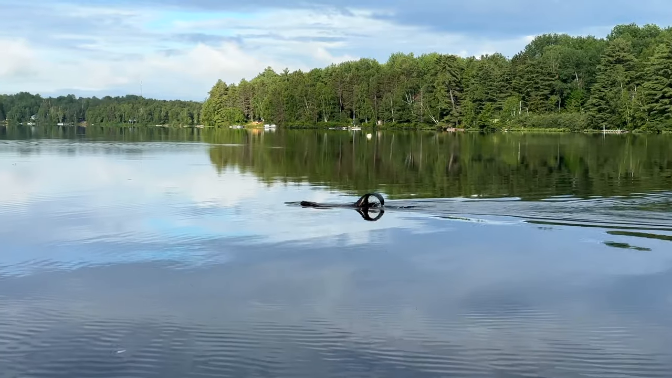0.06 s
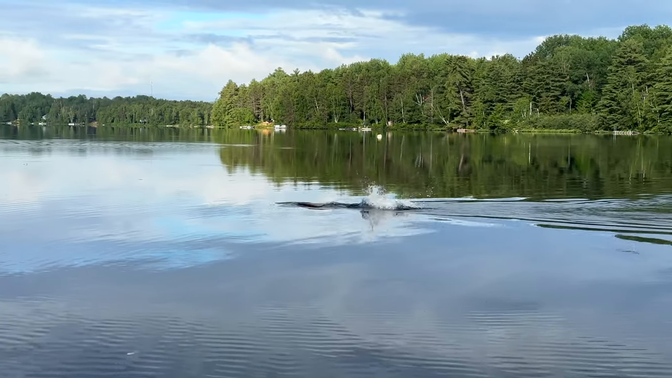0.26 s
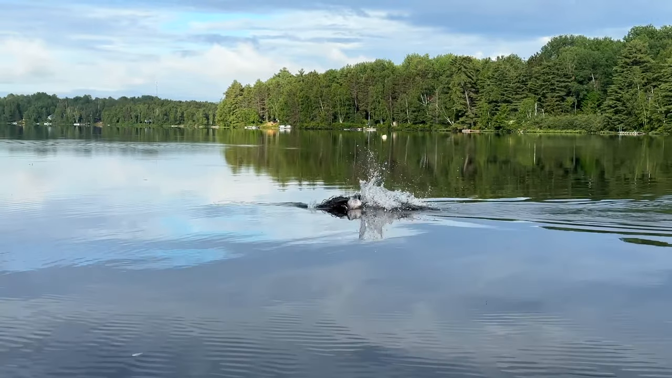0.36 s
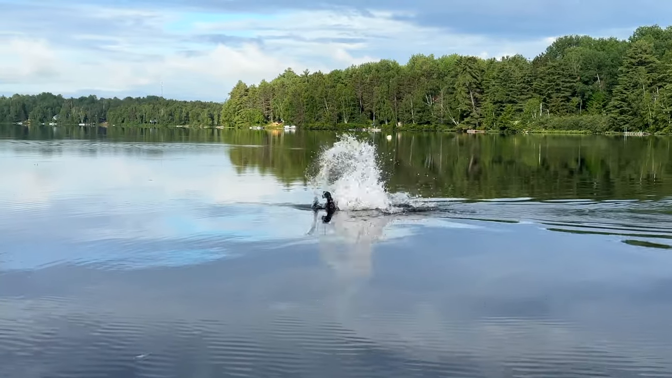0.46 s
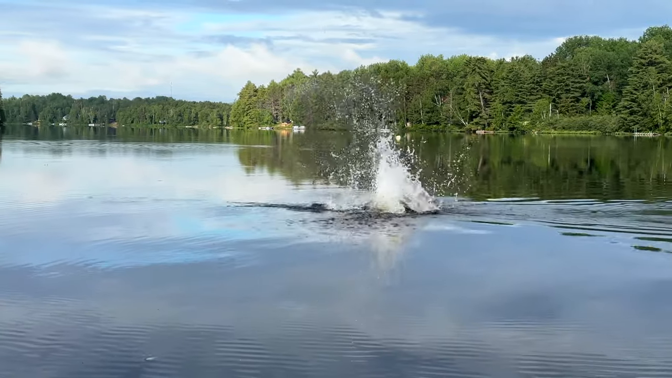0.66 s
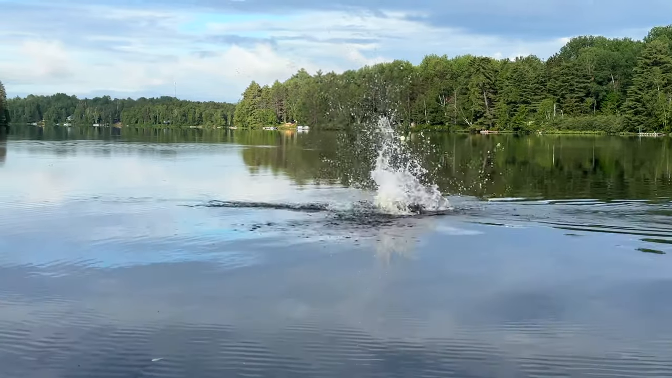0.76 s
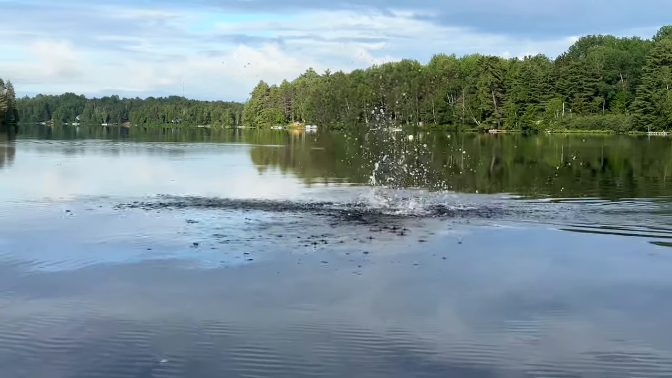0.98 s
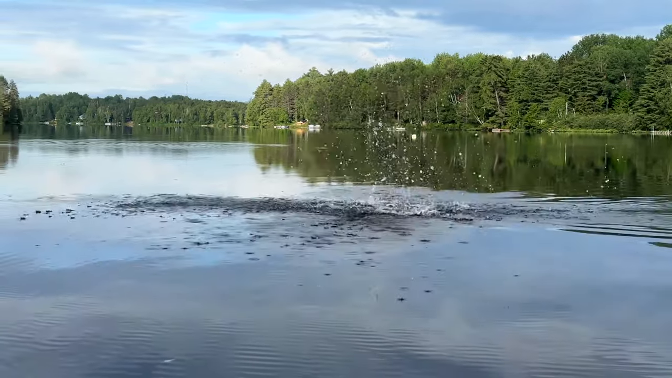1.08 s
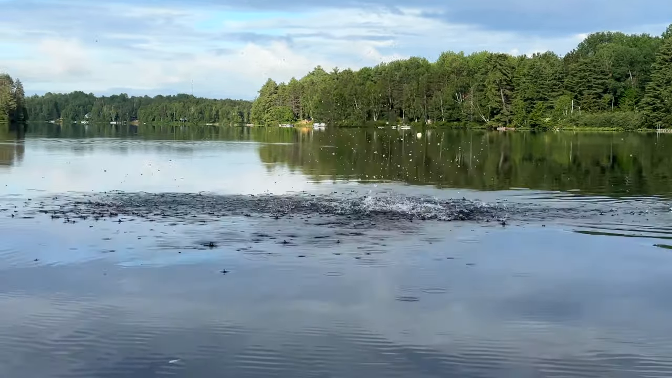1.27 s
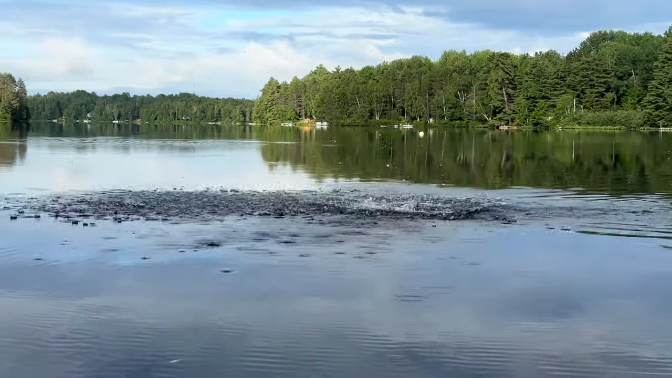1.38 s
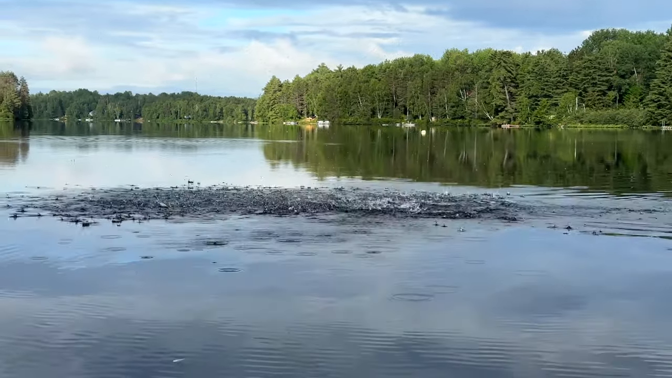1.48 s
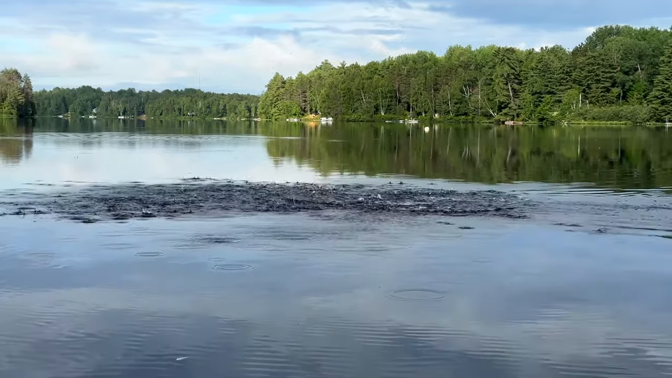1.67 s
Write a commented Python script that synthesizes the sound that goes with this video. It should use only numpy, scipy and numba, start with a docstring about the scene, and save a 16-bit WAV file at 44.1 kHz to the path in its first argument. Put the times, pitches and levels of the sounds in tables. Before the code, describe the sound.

One sharp slap of a beaver's tail on calm water, picked up by a phone on the lakeshore. Soft sloshing leads in; afterwards come a low plunging gulp and falling spray that fades to small ticks and plinks.

```python
"""Soft sloshing, a sharp smack, a deep gulp, then splashing that thins to single ticks and plinks.
A beaver on a still lake heaves, smacks its flat tail on the water and dives; the hollow it leaves
closes with the gulp. Thrown water falls back as churning bubbles and a patter of drops.
A phone with two microphones listens from the shore."""
import sys
import numpy as np
from scipy import signal
from scipy.fft import rfft, irfft, next_fast_len
from scipy.io import wavfile
from numba import njit

SR = 44100
rng = np.random.default_rng(int(sys.argv[2]) if len(sys.argv) > 2 else 0)


def wav_out(sig):
    """Save sig, one row per channel (or a flat mono array), as 16-bit PCM at SR to the path in sys.argv[1]."""
    wavfile.write(sys.argv[1], SR, np.round(np.clip(np.atleast_2d(sig).T, -1, 1) * 32767).astype(np.int16))


N = 77175


def amp(db):
    return 10 ** (np.asarray(db) / 20)


def unit_rms(x):
    return x / np.sqrt(np.mean(x ** 2))


def bandpass(x, edges_hz):
    return signal.sosfilt(signal.butter(2, edges_hz, "band", fs=SR, output="sos"), x)


def column(table, x, col, scale=lambda v: v):
    """Look up x in a table's first column and read column col, blending between rows."""
    rows = np.array(table, float)
    return np.interp(scale(x), scale(rows[:, 0]), rows[:, col])


def coloured_noise(spectrum):
    """Noise of rms 1, shaped by rows of f/Hz, level/dB."""
    hz = np.maximum(np.fft.rfftfreq(N, 1 / SR), 1)
    gain = amp(column(spectrum, hz, 1, scale=np.log))
    return unit_rms(irfft(rfft(rng.standard_normal(N)) * gain, N))


def random_events(table, max_per_s):
    """Random times at the rate in column 3, each with that rate and 0-1 draws for pitch and size."""
    when, chance, pitch_draw, size_draw = rng.random((int(max_per_s * N / SR), 4)).T
    when = when * N / SR
    per_s = np.clip(column(table, when, 3), 50, max_per_s)
    kept = chance < per_s / max_per_s
    return when[kept], per_s[kept], pitch_draw[kept], size_draw[kept]


@njit
def fading_tones(n, start, step, fade, glide, size):
    """Add up short sine waves that swell, fade and may glide; all rates are per sample."""
    out = np.zeros(n)
    for k in range(len(start)):
        wave = size[k] + 0j
        turn = fade[k] * np.exp(1j * step[k])
        bend = np.exp(1j * glide[k])
        hush, hush_fade = 1., fade[k] ** 4  # softens the start
        for i in range(start[k], min(n, start[k] + int(-6 / np.log(fade[k])))):
            out[i] += wave.imag * (1 - hush)
            hush *= hush_fade
            wave *= turn
            turn *= bend
    return out


def swarm(when, hz, db, per_s, cycles, size_draw, scatter_db, glide=0.):
    """Many tiny rings, together near level db; each fades by 60 dB over its number of cycles."""
    scatter = amp(scatter_db * np.minimum(-np.log(size_draw), 4))
    life = cycles * SR / hz  # samples
    step = 2 * np.pi * hz / SR
    decay = np.log(1000) / life
    size = amp(db) * unit_rms(scatter) * np.sqrt(8 * decay * SR / per_s)
    return fading_tones(N, (when * SR).astype(np.int64), step, np.exp(-decay), step * glide / life, size)


def still_air():
    """The faint, steady hush of the air over the lake."""
    # tone of the air: f/Hz, level/dB
    spectrum = [(30, -20), (60, 2), (150, -5.5), (500, -0.5), (1500, -12.5), (4000, -35), (15000, -28.5)]
    return amp(-69.5) * coloured_noise(spectrum)


def wash(t):
    """Waves make a low rumble that is loudest at the gulp."""
    # strength of the waves: t/s, level/dB
    levels = [(0.0, -60.5), (0.146, -64), (0.33, -68), (0.438, -40), (0.526, -65), (0.608, -57.5),
              (1.056, -68), (1.496, -67.5), (1.636, -71), (1.75, -66)]
    middle_hz = 98
    rumble = bandpass(rng.standard_normal(N), [middle_hz / 2, middle_hz * 2])
    return unit_rms(rumble) * amp(column(levels, t, 1))


def churn():
    """Churning water makes bubbles; each rings briefly and rises in pitch."""
    # bubbles: t/s, level/dB, middle f/Hz, rate/(1/s), ring length/cycles
    bubbles = [(0, -53.5, 490, 1300, 10), (.03, -57, 480, 1240, 9), (.055, -45.5, 790, 1100, 9),
               (.096, -41.5, 1050, 1450, 6), (.12, -53, 940, 2100, 8), (.19, -62, 740, 4500, 16.5),
               (.224, -44, 497, 2000, 5.1), (.255, -50, 610, 1130, 4.4), (.322, -45.5, 556, 1650, 12),
               (.346, -38, 820, 1500, 2.7), (.425, -34, 700, 1600, 8.6), (.47, -30.5, 616, 1500, 2.8),
               (.526, -37, 587, 2100, 5.7), (.556, -32, 650, 1250, 3.9), (.58, -39.5, 648, 1760, 10.4),
               (.8, -41.5, 797, 1500, 10.3), (.92, -44.5, 930, 1500, 11.3), (1.0, -43, 1090, 1500, 8.3),
               (1.11, -44.5, 953, 1200, 16.7), (1.22, -53.5, 1175, 780, 16), (1.32, -50.5, 970, 700, 18),
               (1.5, -55.5, 1000, 540, 42), (1.6, -68, 984, 290, 22), (1.75, -72, 1010, 220, 20)]
    when, per_s, pitch_draw, size_draw = random_events(bubbles, max_per_s=2500)
    octaves = np.clip(0.3935 * np.log(pitch_draw / (1 - pitch_draw)), -2.5, 1.2)  # most lie near 0
    hz = column(bubbles, when, 2) * 2 ** octaves
    db, cycles = column(bubbles, when, 1), column(bubbles, when, 4)
    return swarm(when, hz, db, per_s, cycles, size_draw, scatter_db=0.5, glide=0.43)


def patter():
    """Small drops of many pitches land; they get fewer and brighter as the spray runs out."""
    # falling drops: t/s, level/dB, treble tilt/(dB/octave), rate/(1/s)
    drops = [(0, -55, -4, 11300), (.03, -62, -4.5, 10300), (.096, -47, -3.5, 13400),
             (.125, -61.5, 1.5, 8500), (.185, -69.5, -7.5, 14000), (.224, -50.5, -3, 10400),
             (.258, -58, 2, 13000), (.322, -57.5, -6, 9900), (.336, -44, -3, 9300),
             (.388, -48.5, -1.5, 12500), (.4, -35, -2.5, 7700), (.416, -44.5, -0.5, 15000),
             (.7, -47.5, -2, 19000), (.86, -45.5, -3.5, 12800), (1.1, -46.5, -0.5, 14000),
             (1.29, -46, 1, 11600), (1.33, -42.5, 0, 10000), (1.43, -53, 7.5, 8200), (1.5, -53, 2.5, 7100),
             (1.62, -57, 5, 7100), (1.665, -64, 2, 4000), (1.75, -67.5, -1.5, 3000)]
    low_hz, high_hz = 1673, 17800
    when, per_s, pitch_draw, size_draw = random_events(drops, max_per_s=15000)
    octaves = pitch_draw * np.log2(high_hz / low_hz)
    db = column(drops, when, 1) + column(drops, when, 2) * (octaves - 1.5)
    cycles = 9 * 2 ** (octaves / 2)
    return swarm(when, low_hz * 2 ** octaves, db, per_s, cycles, size_draw, scatter_db=2.6)


def ripples(sound):
    """The rippled surface scatters a sound, adding a short tail to it."""
    tail_db, fade_s = -9.5, 0.075
    tail = rng.standard_normal(4000) * amp(-60 * np.arange(4000) / SR / fade_s)
    tail /= np.sqrt(np.sum(tail ** 2))
    return sound + amp(tail_db) * signal.fftconvolve(sound, tail)[:N]


def air_pockets(t):
    """Trapped air rings on a gliding pitch: the lowest pocket is the gulp, high ones are plinks."""
    # ringing pockets: t/s, peak level/dB, f/Hz, length/s, glide/(octaves per length)
    pockets = [(-.003, -41.5, 1164, 0.014, 0), (.006, -45, 298, 0.018, -0.052),
               (.042, -41, 710, 0.0046, -0.14), (0.0446, -28, 292, 0.007, 0.23),
               (.084, -31.5, 814, 0.0068, 0.075), (.093, -33, 1210, 0.007, .1),
               (0.2021, -15.5, 1630, 0.0041, -.1), (.204, -18, 1040, 0.0092, 0.22),
               (.205, -17.5, 766, 0.0087, 0.095), (0.2092, -10.5, 406, 0.006, -0.13),
               (0.281, -40.5, 426, .012, -0.13), (0.345, -25, 1220, 0.003, 0.26),
               (.354, -25, 800, 0.0058, .1), (.397, -26.5, 1090, 0.0044, 0.14),
               (0.4361, -16.5, 341, 0.0085, -0.073), (.4385, -25, 895, 0.0055, -0.046),
               (0.4431, -7.5, 143.6, 0.016, -.1), (.380, -26.5, 575, 0.0083, 0.018),
               (.401, -29, 520, 0.0049, 0.6), (.479, -19.5, 330, 0.0072, -0.026),
               (.558, -24, 608, 0.0074, -0.13), (0.8164, -26, 299, 0.012, 0.29),
               (1.0065, -34.5, 1300, 0.0026, -0.32), (1.043, -42, 1470, 0.0047, -0.5),
               (1.092, -44, 1510, 0.0042, 0.22), (1.262, -54, 1144, 0.018, 0.31),
               (1.279, -52, 476, 0.047, 1.23), (1.313, -35, 1640, 0.0029, 0.1),
               (1.322, -37, 1710, 0.0051, 0.098), (1.361, -51, 469, 0.043, 1.46),
               (1.426, -41, 1710, 0.0045, 0.24), (1.481, -57, 580, 0.041, 0.84),
               (1.560, -56, 850, 0.013, -0.076), (1.595, -54, 1007, 0.02, 0.028),
               (1.611, -52, 1120, 0.02, 0.15), (1.643, -55, 2030, .008, -0.25),
               (1.692, -55.5, 916, .032, 0.045), (1.725, -58.5, 1370, .016, 0.25)]
    peak_age = 0.37
    out = np.zeros(N)
    for start, db, hz, length, glide in pockets:
        age = np.clip((t - start) / length, 0, 2)  # counted in lengths; the ring ends at 2
        swell = (age / peak_age * np.exp(1 - age / peak_age)) ** 2 * (age < 2)
        gliding_hz = hz * 2 ** (glide * age) * (age > 0)
        out += amp(db) * swell * np.sin(2 * np.pi * np.cumsum(gliding_hz) / SR)
    return out


def tail_slap(t):
    """The tail hits the water: a gritty burst that dulls at once and stops short, then a brief spatter."""
    # tone of the smack: f/Hz, level/dB
    spectrum = [(100, -35), (390, -7), (560, -1), (740, 5.5), (880, -4.5), (1040, 7), (1300, -51.5),
                (1570, 4.5), (2400, -6.5), (3200, -1.5), (4700, -15), (5400, 3), (6200, -13), (9000, -11),
                (15000, -10)]
    start_s, rise_s, hold_s, stop_s = .2023, .0008, .008, .0015
    spatter_db, spatter_fade_s, grit_db = -12, 0.11, 2.5
    split_hz, dulling_db_per_s = 2500, 1100
    age = t - start_s
    after_hold = np.maximum(age - hold_s, 0)
    burst = np.exp(np.clip(age, -1, 0) / rise_s - after_hold / stop_s)
    spatter = amp(spatter_db - 60 * after_hold / spatter_fade_s) * (age > 0)
    grit = amp(grit_db * np.repeat(rng.standard_normal(N // 30 + 1), 30)[:N])  # jumps every 30 samples
    noise = coloured_noise(spectrum)
    low = signal.sosfiltfilt(signal.butter(2, split_hz, fs=SR, output="sos"), noise)
    high = (noise - low) * amp(-dulling_db_per_s * np.clip(age, 0, hold_s))
    return amp(-17.5) * (burst + spatter) * grit * (low + high)


def ticks():
    """Single drops stand out as they land, each a snap of noise around its own pitch."""
    # single drops: t/s, peak level/dB, f/Hz
    drops = [(0.312, -46, 3500), (0.3316, -33.5, 4640), (0.3445, -30.5, 2000), (0.3968, -34, 2770),
             (0.436, -31, 2800), (0.4684, -28, 2280), (0.5425, -30.5, 4000), (0.8495, -28.5, 3300),
             (1.0064, -26, 2060), (1.0935, -29.5, 3800), (1.1546, -30, 3740), (1.2728, -34.5, 5700),
             (1.2984, -31, 5980), (1.3114, -35, 3570), (1.3224, -29, 4280), (1.3309, -30.5, 4100),
             (1.347, -26, 2760), (1.367, -29, 8630), (1.3823, -31.5, 3600), (1.405, -41, 8560),
             (1.4202, -31.5, 5460), (1.439, -31, 4300), (1.4467, -23, 6200), (1.4619, -25.5, 8200),
             (1.4774, -34, 8630), (1.4892, -40, 8230), (1.5264, -45, 9720), (1.5557, -39, 9050),
             (1.561, -32, 9100), (1.5774, -48, 9100), (1.5927, -30.5, 9700), (1.606, -35, 14400),
             (1.6275, -31, 5860), (1.6419, -44, 2060), (1.663, -51, 9530), (1.6821, -47, 14000),
             (1.6982, -36, 13500), (1.7084, -47, 8220), (1.718, -40, 13800), (1.7234, -39.5, 15300)]
    fade_s, width_octaves = .008, .9
    age = np.arange(2000) / SR
    out = np.zeros(N + len(age))
    for start, db, hz in drops:
        edges_hz = np.clip([hz * 2 ** (-width_octaves / 2), hz * 2 ** (width_octaves / 2)], 100, .45 * SR)
        snap = bandpass(rng.standard_normal(len(age)) * amp(-60 * age / fade_s), edges_hz)
        i = int(start * SR)
        out[i:i + len(age)] += amp(db) * snap / np.abs(snap).max()
    return out[:N]


def lake(t, single_drops=0):
    """Bubbles, waves, drops and air, with fresh randomness on every call."""
    return churn() + wash(t) + ripples(single_drops + patter()) + still_air()


def scene():
    """Two rows: the sound both microphones share, and more lake sound that reaches them differently."""
    t = np.arange(N) / SR
    shared = tail_slap(t) + air_pockets(t) + lake(t, ticks())
    return np.array([shared, lake(t)])


def record(dry):
    """Two microphones colour the sound; the second row is added on the left, subtracted on the right."""
    # microphone response: f/Hz, level/dB
    response = [(30, -4.5), (900, -2), (1600, 2), (2150, -2.5), (2800, 0.5), (4200, 3.5), (4800, -1.5),
                (5500, 2.5), (6700, -5.5), (7700, 4.5), (9000, 0.5), (10000, 4), (11800, -3), (13500, -4.5),
                (14700, 1), (16000, -9)]
    # how the two sides differ: f/Hz, right side's lead/cycles, unshared amount/(0-1)
    sides = [(0, 0.004, 0.05), (897, 0.046, 0), (1317, 0.015, 0.05), (1723, 0.47, 0), (1980, 0.84, 0.1),
             (3660, 0.91, 0), (4160, 0.97, 0), (6730, 0.98, 0), (7370, 0.64, 0), (8140, 0.046, 0.5),
             (9000, 0, 0), (9810, 0.25, 0.74), (10550, .5, 0), (11950, .5, 0), (12200, 0.61, 1),
             (13600, 0.94, 0), (16500, 1, 0.14)]
    # how much louder the left side is: f/Hz, level/dB
    balance = [(30, 1.5), (400, 1.5), (1100, 2.5), (1550, 6), (2000, -5), (2500, 0)]
    bass_cut_hz, treble_cut_hz = 50, 15950
    size = next_fast_len(N + 4096)
    hz = np.fft.rfftfreq(size, 1 / SR)
    shared, apart = rfft(dry, size)
    apart_share = np.clip(column(sides, hz, 2), 0, 1) / 2
    shared *= np.sqrt(1 - apart_share)
    apart *= np.sqrt(apart_share)
    colour_db = column(response, hz, 1) - 10 * np.log10(1 + (bass_cut_hz / (hz + 1)) ** 6)
    lean_db = column(balance, hz, 1) / 2
    lead = np.exp(2j * np.pi * column(sides, hz, 1))
    left = amp(colour_db + lean_db) * (shared + apart)
    right = amp(colour_db - lean_db) * (shared - apart) * lead
    stereo = irfft(np.array([left, right]), size)[:, :N]
    return signal.sosfilt(signal.ellip(10, .2, 70, treble_cut_hz, fs=SR, output="sos"), stereo)


dry = scene()
out = record(dry)
wav_out(out)
```